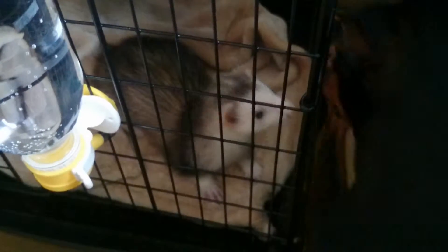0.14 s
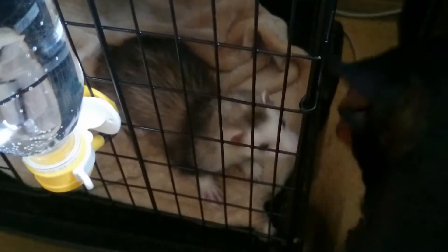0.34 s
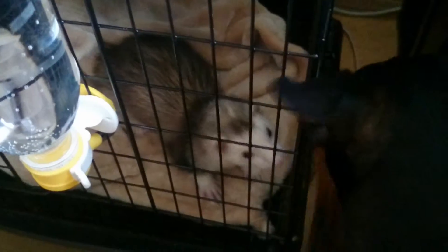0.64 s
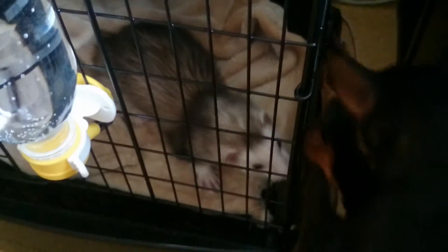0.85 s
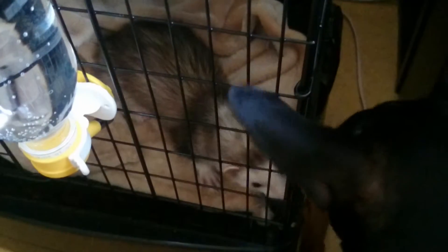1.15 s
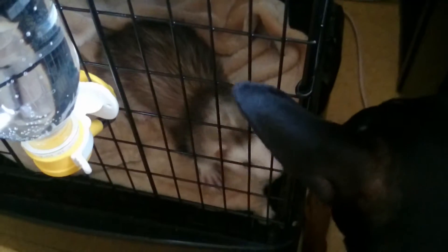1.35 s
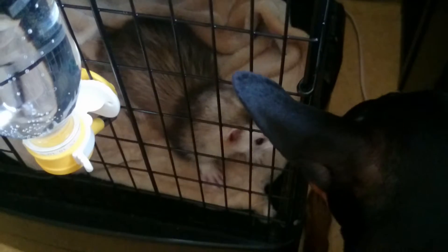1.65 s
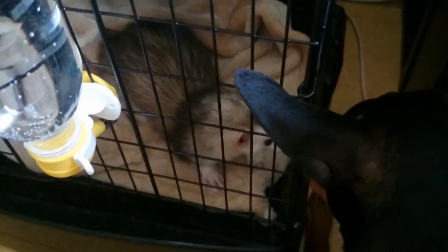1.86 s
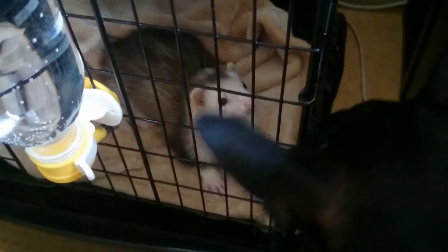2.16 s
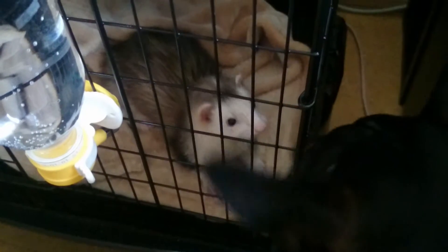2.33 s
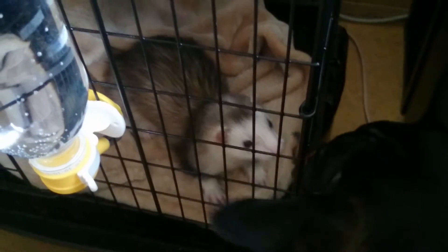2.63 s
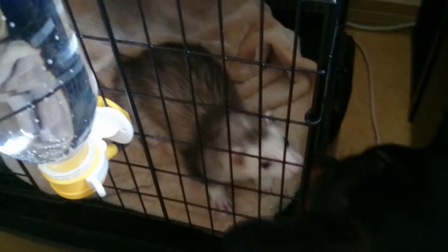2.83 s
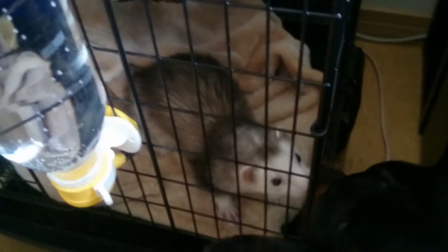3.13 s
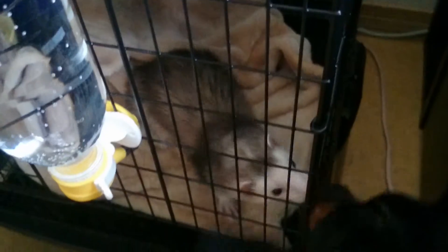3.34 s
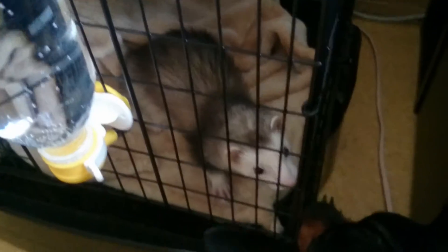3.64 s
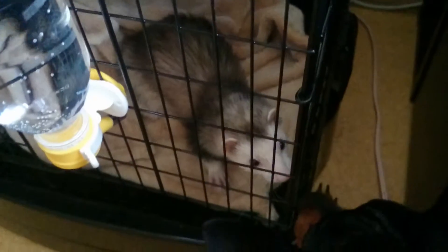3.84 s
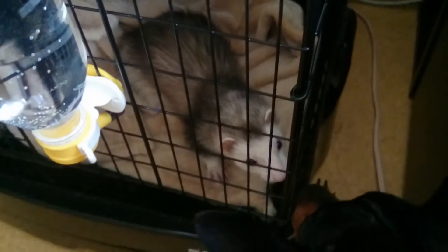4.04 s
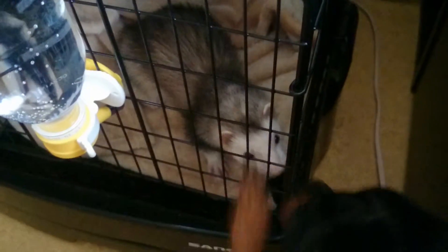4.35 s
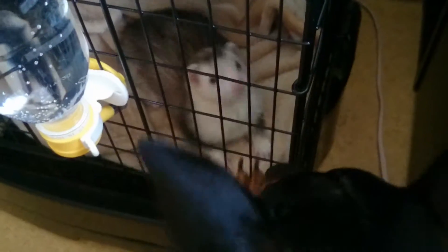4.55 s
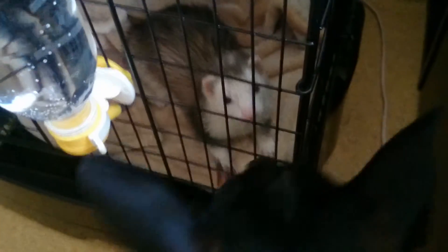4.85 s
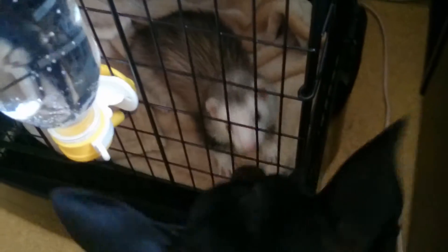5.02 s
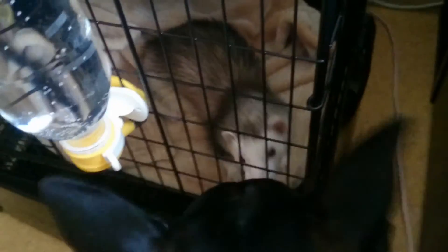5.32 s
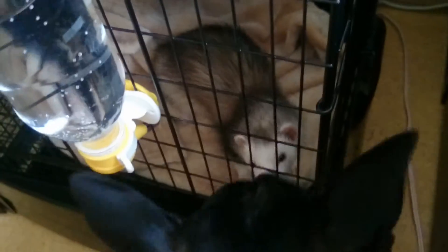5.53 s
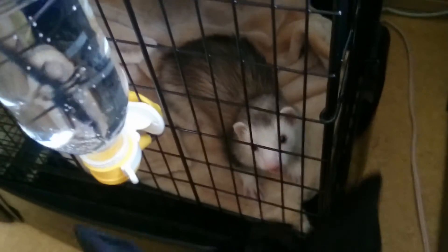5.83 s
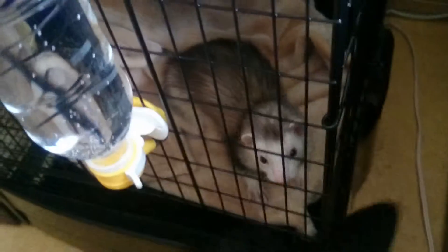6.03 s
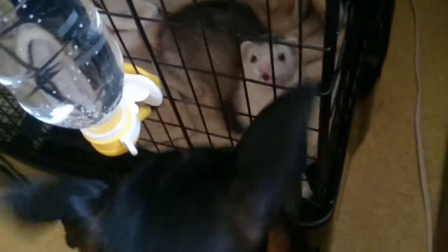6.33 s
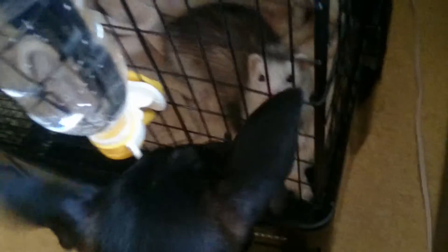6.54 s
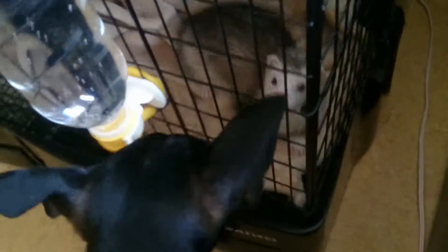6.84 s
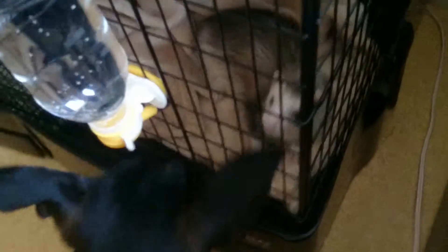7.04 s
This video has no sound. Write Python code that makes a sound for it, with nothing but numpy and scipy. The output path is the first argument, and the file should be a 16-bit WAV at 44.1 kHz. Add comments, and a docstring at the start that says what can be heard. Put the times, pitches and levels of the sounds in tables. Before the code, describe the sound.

A small dog noses a wire pet cage, making irregular metallic clicks, rattles and scratchy rubbing in an echoing room.

```python
"""In a hard, echoing room, a small dog noses and sniffs at a ferret's wire cage, close to a handheld camera.
Each nudge sets the bars chattering for a few milliseconds, and the room carries it on. Wires tick together
and bars spring back ringing. In between, muzzle and paws rub along bars and bedding, and soft thumps land
on the cage base. Hiss and handling rumble lie underneath; each microphone port adds its own treble peak."""
import sys
import numpy as np
from scipy import signal
from scipy.fft import rfft, irfft, next_fast_len
from scipy.io import wavfile
from scipy.ndimage import uniform_filter1d

SR = 44100
rng = np.random.default_rng(int(sys.argv[2]) if len(sys.argv) > 2 else 0)


def wrap_up_sound(samples):
    """Save the sound to the file named by the first command line argument, as 16-bit audio."""
    columns = np.atleast_2d(samples).T
    # keep every value between -1 and 1, then stretch to whole-number steps
    tamed = np.clip(columns, -1, 1)
    steps = np.round(tamed * 32767).astype(np.int16)
    wavfile.write(sys.argv[1], SR, steps)


N = 316638
EVENT_SAMPLES = 30000
HZ = np.fft.rfftfreq(512, 1 / SR)
PORT_GAP_S, PORT_LAG_S = 0.00043, 0.00024  # travel time between the ports; the right one's lag from the cage
FRAME_LIFT_DB, BAR_LIFT_DB = 5.5, 4.5  # the two resonances of a struck spot
BAND_LIMIT_HZ = 15900

# EQ curves. Each row: frequency in Hz, gain in dB.
HISS_EQ = [(30, -30), (100, -58), (250, -58), (600, -58), (1500, -68), (4000, -71.5), (5700, -76),
           (9000, -68.5), (12000, -64), (15000, -77.5)]  # room tone
RUMBLE_EQ = [(8, 0), (25, 5.5), (45, -10.5), (90, -7.5), (160, -18), (400, -32.5), (2000, -100)]  # hands on the camera
ROOM_EQ = [(30, -20), (80, -0.5), (140, 6), (250, -9), (340, -2.5), (600, -6), (950, 1.5), (1600, -6),
           (2400, -1), (3400, -3.5), (9000, 3), (15000, -5.5)]  # the hard room's reverb
PUFF_EQ = [(30, 6.5), (80, 18), (160, 27), (320, 5.5), (480, 17), (750, -15), (2000, -19), (15000, -60)]  # dull bloom after a thump
CRACK_EQ = [(100, -24.5), (1000, -12), (2500, -9.5), (5000, -0.5), (9000, 4), (15000, -0.5)]  # bright metal contact
CLACK_EQ = [(60, -14.5), (300, -13), (1000, -9.5), (3500, -15.5), (7000, -18.5), (15000, -34.5)]  # body of the frame
LEFT_PORT_EQ = [(30, -7.5), (300, 0.5), (3500, 2), (4500, 3), (6500, -2), (7300, 3.5), (8000, 6.5),
                (9200, 5.5), (10500, -2), (12600, 2), (13600, -1), (14400, -1.5), (15600, -6.5)]
RIGHT_PORT_EQ = [(30, 6), (300, 1), (3700, 3.5), (4800, 4), (5400, 10), (6000, 10.5), (6500, 1),
                 (7700, -10.5), (10000, -14), (13500, -10.5), (15500, -6)]
# Reverb tail. Each row: frequency in Hz, time to fall 60 dB in seconds.
ROOM_DECAY = [(150, 0.47), (1000, 0.31), (3000, 0.33), (6000, 0.35), (9000, 0.25), (15000, .27)]
# Fader ride of the handling rumble. Each row: time in seconds, level in dB before each port's trim.
HANDLING_RIDE = [(0.0, -54), (1.12, -45), (1.56, -59.5), (2.2, -53), (2.26, -35.5), (2.52, -64.5),
                 (2.6, -41), (2.66, -46), (3.3, -52), (3.46, -39.5), (3.52, -50), (4.78, -56), (5.0, -45),
                 (5.94, -51.5), (6.1, -49), (6.28, -41), (6.86, -50.5), (7.18, -36.5)]
# Modes of the cage base. Each row: pitch in Hz before detuning, relative level in dB,
# time to fall 60 dB in seconds before a thump scales it.
BASE_MODES = [(65, -7, .22), (95.3, 1.5, 0.14), (153.5, -7.5, 0.19), (265, 1.5, 0.028), (441, -6, 0.061),
              (505, -15.5, 0.15), (920, -20, .04)]
# Bending modes of the bars. Each row: pitch in Hz, relative level in dB, time to fall 60 dB in seconds.
BAR_MODES = [(318, -27, .55), (400, -29, .5), (457, -21, .29), (755, -31, .56), (836, -31, .38),
             (982, -28, .76), (2320, -26, .25), (4490, -22, .28), (5377, -17.5, .27), (5450, -18, .3),
             (5839, -20, .3), (6011, -18.5, .22), (6164, -19, .22), (6282, -19, .26), (8420, -19, .3),
             (8875, -19.5, .3), (9222, -19.5, .28)]
# Soft thumps on the cage base and floor. Each row: start in seconds, gain in dB, factor on the ring time.
BASE_THUMPS = [(2.013, -53, 1), (2.305, -36.5, 0.82), (2.583, -24.5, 0.83), (4.565, -43, 0.95),
               (5.908, -30, 0.39), (5.97, -28, 0.18), (6.658, -26.5, 0.36)]
# Muzzle and paws rubbing. Each row: start in seconds, length in seconds, level in dB,
# brightness in dB (plus on wire, minus on bedding).
RUB_STROKES = [(0, 0.024, -39.5, -5.5), (.04, .09, -49.5, -17), (0.179, 0.11, -32, -7.5),
               (.698, 0.083, -44, 1.5), (1.28, 0.096, -55, -14.5), (2.02, 0.038, -53.5, -4),
               (2.182, 0.12, -33.5, 6), (2.28, 0.11, -41.5, -2), (2.41, 0.088, -37.5, -3.5),
               (2.864, 0.075, -41, -1.5), (3.132, 0.1, -44.5, -8), (3.28, 0.34, -35.5, -1.5),
               (3.847, 0.49, -61, -8), (4.289, 0.18, -52.5, -4), (4.641, .1, -39.5, -8.5),
               (4.848, 0.11, -31.5, -6.5), (4.99, .2, -36, -8.5), (5.353, 0.047, -23.5, -4.5),
               (5.518, 0.073, -35, -5.5), (5.626, 0.077, -23, -8), (5.76, 0.27, -49, -17.5),
               (6.0, 0.5, -52.5, -8), (6.205, 0.16, -35, -8), (6.57, .21, -31.5, -4.5),
               (6.789, .157, -36.5, -6), (6.948, .12, -33, -2.5), (7.057, 0.12, -28.5, -6.5)]
# Bars ringing freely. Each row: start in seconds, gain of the low modes in dB, gain of the high modes in dB.
BAR_TWANGS = [(0.257, -34.5, -25), (0.447, -28.5, -18), (1.069, -13.5, -21.5), (2.142, -29, -21),
              (3.442, -25.5, -12), (3.654, -28.5, -25.5), (4.716, -28, -22.5), (5.321, -29, -19),
              (6.409, -18, -14.5)]
# Wire touching wire. Each row: start in seconds, level in dB, pan in dB (plus is left), resonance in Hz.
WIRE_TICKS = [(0.26, -24.5, 1, 3700), (.499, -16, -2.5, 3700), (0.772, -36, 1, 3000),
              (1.144, -27.5, 3, 6000), (2.145, -23, -1, 6000), (3.466, -21.5, -8, 5604),
              (3.759, -29.5, -9, 3200), (4.365, -44, -5, 4500), (5.439, -21.5, 3, 12600),
              (5.903, -25, -13, 4500), (6.277, -40, 12, 6100), (6.381, -42, 12, 5700),
              (7.058, -37, 6, 9370), (7.167, -34, 10, 6500)]
# Where the dog works along the cage. Each row: time in seconds, pan in dB (plus is left).
MUZZLE_PAN = [(0, 10.5), (2.1, 3.5), (3.45, 3.5), (4.5, 18), (5.3, 6), (5.7, 9), (6.4, 7), (7.18, 29)]
# Nudges that rattle the cage. Each row: start in seconds, attack in seconds, strength in dB, mids and bass
# each in dB above that strength, resonance of the frame in Hz, resonance of the struck bar in Hz.
NUDGES = [(0.126, 0.0036, -27.5, -2.5, 0.5, 980, 9700), (0.254, 0.0036, -26.5, 3, 5, 1000, 3780),
          (0.388, 0.0043, -50.5, 19, 22, 1280, 9700), (.43, 0.0048, -26.5, 4, 12.5, 1100, 10000),
          (.446, 0.0073, -19.5, -9.5, -2, 2380, 12800), (.496, 0.0013, -27, 4, -7.5, 1450, 3700),
          (0.702, 0.005, -31.5, -11, -11.5, 2500, 3900), (0.765, 0.0021, -40, 6, 6, 1800, 3300),
          (0.85, 0.0029, -38.5, 17, 20, 1100, 2264), (1.054, 0.0042, -33, 8, 22.5, 1060, 6600),
          (1.068, 0.0055, -22.5, 9, 6.5, 526, 4000), (2.117, 0.0036, -21, 0.5, -12, 1390, 7300),
          (2.13, .0035, -25, 0, -7.5, 1600, 5900), (2.141, 0.0048, -21, -1, -3.5, 890, 5500),
          (2.7, 0.014, -33.5, 2, 2.5, 1680, 8700), (2.864, 0.011, -36.5, 0, 11.5, 2240, 10100),
          (3.046, 0.013, -33.5, 6.5, 8, 1000, 4700), (3.296, 0.011, -36.5, 6, 19, 836, 12600),
          (3.388, 0.0045, -40.5, -8, 13.5, 1780, 11400), (3.417, 0.0049, -31, 14, 15.5, 1098, 13000),
          (3.428, 0.0031, -18.5, 2.5, -3.5, 1700, 3800), (3.438, 0.0064, -19, -5, -3.5, 950, 8400),
          (3.464, 0.0084, -20.5, -32, -3.5, 650, 5600), (3.61, 0.0037, -23.5, 1, -4, 1110, 6950),
          (3.651, 0.0033, -18.5, -3.5, -1.5, 1830, 3500), (4.256, 0.007, -45.5, 4.5, -19, 1000, 4700),
          (4.458, 0.015, -38.5, 1, -22, 1680, 9900), (4.493, 0.0073, -29.5, -8.5, -8, 1830, 12900),
          (4.507, .009, -29.5, 1.5, -10, 890, 8700), (4.613, 0.0026, -38.5, 4, 11.5, 2500, 13000),
          (4.715, 0.0095, -27, 5.5, -13, 408, 4400), (4.73, 0.011, -26, 0, -10, 2300, 3980),
          (4.828, 0.007, -36, 4.5, 0, 1480, 13000), (4.841, 0.0074, -29, -20, -12, 2280, 9200),
          (4.938, 0.0065, -40, 11.5, 23.5, 930, 7500), (5.007, 0.0047, -31, -0.5, 13.5, 910, 13300),
          (5.053, 0.0041, -32.5, 4.5, 5, 1180, 3980), (5.071, 0.0034, -34, -3, 3, 2420, 5800),
          (5.168, 0.0089, -31.5, -2.5, -10, 640, 9500), (5.309, 0.012, -20, 1, 3, 580, 9200),
          (5.321, 0.01, -21, 4, 6, 766, 9450), (5.414, 0.0051, -27, -4, -10, 2520, 3600),
          (5.526, 0.0074, -28.5, -6.5, -16, 1500, 11600), (5.655, 0.0044, -32.5, -15, -2, 960, 12700),
          (5.742, 0.0064, -29, -2, -2.5, 450, 10000), (5.829, 0.0033, -31.5, 5, 2, 1900, 4100),
          (6.302, .004, -36.5, 5, -26, 1560, 5200), (6.406, .007, -20.5, 4.5, 7, 1670, 5450),
          (6.421, 0.009, -20.5, 5.5, 4.5, 2300, 4530), (6.612, 0.0056, -33, 0.5, -6, 580, 12500),
          (6.637, 0.0043, -41.5, -4, 23.5, 613, 8040), (6.789, 0.0069, -30.5, 2, 12.5, 1250, 8600),
          (6.823, 0.0037, -27, -5.5, -17, 2510, 6300), (6.956, 0.0039, -34.5, -8, -4, 2000, 9600),
          (6.985, 0.0055, -32.5, 2, 8.5, 2220, 5900), (7.099, 0.0044, -34.5, 4.5, 21, 1440, 5630)]


def amp(db):
    """Decibels to gain."""
    return 10 ** (np.asarray(db) / 20)


def pan(side_db):
    """Stereo gains that put the left side_db above the right."""
    return amp([[side_db / 2], [-side_db / 2]])


def curve(points, hz=HZ):
    """Joins rows of frequency and value on a log-frequency axis."""
    freqs, values = np.transpose(points)
    return np.interp(np.log(hz + 1), np.log(freqs + 1), values)


def equalise(x, points):
    """Runs x through an EQ curve."""
    size = next_fast_len(x.shape[-1] + 1024)
    gain = amp(curve(points, np.fft.rfftfreq(size, 1 / SR)))
    return irfft(rfft(x, size) * gain, size)[..., :x.shape[-1]]


def add(mix, start, sound):
    """Drops a stereo sound into the mix at start seconds."""
    part = mix[:, max(round(start * SR), 0):][:, :sound.shape[1]]
    part += sound[:, :part.shape[1]]


def three_bands(treble_db, mid_db, bass_db):
    """Tone of one contact in dB: the bars give the treble, the frame the mids, the base the bass."""
    return curve([(330, bass_db), (900, mid_db), (2400, mid_db), (5200, treble_db)])


def resonance(centre_hz, lift_db, octaves=0.37):
    """A broad bell boost in dB."""
    return lift_db * np.exp(-.5 * (np.log2((HZ + 1) / centre_hz) / octaves) ** 2)


def grit(depth_db, grain_samples):
    """A gain of unit power that flickers as tiny contacts come and go."""
    flicker = uniform_filter1d(rng.standard_normal(EVENT_SAMPLES), grain_samples) * np.sqrt(grain_samples)
    gain = amp(depth_db * flicker)
    return gain / np.sqrt(np.mean(gain ** 2))


def background():
    """The bed: steady room hiss, and handling rumble that the two ports partly share."""
    hiss = equalise(rng.standard_normal((2, N)), HISS_EQ)
    shared, left, right = equalise(rng.standard_normal((3, N)), RUMBLE_EQ)
    rumble = np.array([shared + .7 * left, shared + 1.1 * right]) / np.std(shared)
    ride_db = np.interp(np.arange(N) / SR, *np.transpose(HANDLING_RIDE))
    port_trim = amp([[-3], [-2.5]])
    return hiss + rumble * amp(ride_db) * port_trim


def room_wash(tone_db, t60, ripple_db):
    """Noise from all round the room: nearly mono in the bass, wide in the treble."""
    t = np.arange(EVENT_SAMPLES // 128 + 2) * 128 / SR
    ripple = amp(ripple_db * uniform_filter1d(rng.standard_normal(len(HZ)), size=2) * np.sqrt(2))
    tone = amp(tone_db) * ripple / np.sqrt(np.mean(ripple ** 2))
    noise = rng.standard_normal((2, EVENT_SAMPLES + 512))
    left, unrelated = signal.stft(noise, nperseg=512, noverlap=384)[2][..., :len(t)]
    coherence = 0.86 * np.exp(-(2 * HZ[:, None] * PORT_GAP_S) ** 2)
    lag = np.exp(-2j * np.pi * HZ * PORT_LAG_S)[:, None]
    right = coherence * lag * left + np.sqrt(1 - coherence ** 2) * unrelated
    decay = np.exp(-np.log(1000) * t / t60[:, None])
    spectra = np.array([left, right]) * tone[:, None] * decay
    return signal.istft(spectra, nperseg=512, noverlap=384)[1][:, :EVENT_SAMPLES]


def base_thump(gain_db, ring_factor, attack_s=0.0029, room_db=-4):
    """A padded blow rings the low modes of the cage base and leaves a dull puff in the room."""
    t = np.arange(EVENT_SAMPLES) / SR
    hz, mode_db, t60 = np.transpose(BASE_MODES)
    t60 = t60 * ring_factor
    detuned_hz = hz * rng.uniform(0.93, 0.94, len(hz))
    ring = sum(amp(db - 60 * t / life) * np.sin(2 * np.pi * pitch * t)
               for pitch, db, life in zip(detuned_hz, mode_db, t60))
    puff = room_wash(curve(PUFF_EQ) + room_db, np.interp(HZ, hz, t60), ripple_db=3)
    return amp(gain_db) * (ring + puff) * (1 - np.exp(-t / attack_s))


def rub(length, level_db, bright_db, linger_s=0.043, catches_per_s=35, catch_db=5):
    """Scratchy friction of muzzle or paw swells and fades, catching in tiny ticks and hanging in the room."""
    t = np.arange(EVENT_SAMPLES) / SR
    stroke = np.sin(np.pi * np.clip(t / length, 0, 1)) ** 2
    hold = np.exp(-1 / (linger_s * SR))
    swell = np.sqrt(signal.lfilter([1 - hold], [1, -hold], stroke ** 2))
    treble_db = level_db + bright_db
    tone_db = three_bands(treble_db, level_db, level_db - bright_db) + curve(ROOM_EQ)
    friction = room_wash(tone_db, t60=np.full(len(HZ), np.inf), ripple_db=1)
    catches = (rng.random(len(t)) < catches_per_s / SR) * rng.random(len(t)) * stroke
    tick_envelope = signal.fftconvolve(catches, np.exp(-t / 0.0033))[:len(t)]
    ticks = equalise(tick_envelope * rng.standard_normal((2, len(t))), CRACK_EQ)
    scratch = swell * friction * grit(depth_db=1.5, grain_samples=200)
    side_db = 3 + 0.44 * bright_db  # brighter strokes sit further left
    return (scratch + amp(treble_db + catch_db) * ticks) * pan(side_db)


def bar_twang(low_db, high_db, attack_s=0.002):
    """A bar springs back and its bending modes ring out, reaching each port in a different phase."""
    t = np.arange(EVENT_SAMPLES) / SR
    hz, mode_db, t60 = np.transpose(BAR_MODES)
    tilt_db = curve([(1000, low_db), (4500, high_db)], hz)
    strength = amp(mode_db + tilt_db) * rng.uniform(1.0, 1.51, len(hz))
    phase = np.exp(2j * np.pi * rng.random((2, len(hz))))
    rings = np.exp(np.outer(2j * np.pi * hz - np.log(1000) / t60, t))
    return ((strength * phase) @ rings).real * (1 - np.exp(-t / attack_s))


def cage_hit(attack_s, crack_db, side_db, body_db, spot_db, clack_db=-4):
    """Chattering metal cracks, the frame clacks and the room answers, all coloured by the struck spot."""
    t = np.arange(EVENT_SAMPLES) / SR
    chatter = (t / attack_s * np.exp(1 - t / attack_s)) ** 1.8
    contacts = rng.standard_normal((2, len(t))) * grit(depth_db=2, grain_samples=18)
    crack = equalise(contacts * chatter, np.c_[HZ, curve(CRACK_EQ) + spot_db])
    sides = pan(side_db)
    crack *= amp(crack_db) * sides / np.sqrt(np.mean(sides ** 2))
    tone_db = body_db + spot_db
    clack = equalise(rng.standard_normal(len(t)) * chatter, np.c_[HZ, tone_db + clack_db + curve(CLACK_EQ)])
    clack = np.array([clack, np.interp(t - PORT_LAG_S, t, clack)])  # reaches the left port first
    reverb = room_wash(tone_db + curve(ROOM_EQ), curve(ROOM_DECAY), ripple_db=3)
    build_up = np.cumsum(chatter ** 2) / np.sum(chatter ** 2)  # the room fills as the chatter feeds it
    return crack + clack + build_up * reverb * grit(depth_db=0.1, grain_samples=110)


def wire_tick(level_db, side_db, wire_hz):
    """One dry touch of wire on wire, too light to stir the frame or the room much."""
    body_db = three_bands(level_db - 15, level_db - 15.5, level_db - 15.5)
    spot_db = resonance(2340, FRAME_LIFT_DB) + resonance(wire_hz, lift_db=9, octaves=0.26)
    return cage_hit(attack_s=0.0017, crack_db=level_db, side_db=side_db, body_db=body_db, spot_db=spot_db)


def nudge(start, attack_s, strength_db, mid_db, bass_db, frame_hz, bar_hz):
    """The muzzle knocks the bars: the harder and more sudden, the more the crack cuts through the room."""
    force_db = strength_db + 30  # against a typical nudge of -30 dB
    slowness = np.log2(attack_s / .005)  # doublings of a typical attack
    crack_db = strength_db + 1.5 + 0.32 * force_db - 5 * slowness
    side_db = np.interp(start, *np.transpose(MUZZLE_PAN))
    body_db = three_bands(strength_db, strength_db + mid_db, strength_db + bass_db)
    focus_db = -0.0351 * force_db  # a light touch stirs its own spot, a hard one shakes the cage more evenly
    frame_db = resonance(frame_hz, FRAME_LIFT_DB + focus_db)
    bar_db = resonance(bar_hz, BAR_LIFT_DB + focus_db, octaves=0.26)
    return cage_hit(attack_s, crack_db, side_db, body_db, frame_db + bar_db)


def scene():
    """Every contact with the cage, layered over the bed."""
    mix = background()
    for start, *blow in NUDGES:
        add(mix, start, nudge(start, *blow))
    for source, cues in ((wire_tick, WIRE_TICKS), (bar_twang, BAR_TWANGS),
                         (rub, RUB_STROKES), (base_thump, BASE_THUMPS)):
        for start, *settings in cues:
            add(mix, start, source(*settings))
    return mix


def record(dry):
    """The microphone chain: each port's resonances, overload at full scale, then a steep low-pass."""
    heard = np.clip([equalise(dry[0], LEFT_PORT_EQ), equalise(dry[1], RIGHT_PORT_EQ)], -1, 1)
    low_pass = signal.firwin(301, BAND_LIMIT_HZ, window=("kaiser", 8), fs=SR)
    return signal.oaconvolve(heard, low_pass[None], "same")


dry = scene()
out = record(dry)
wrap_up_sound(out)
```